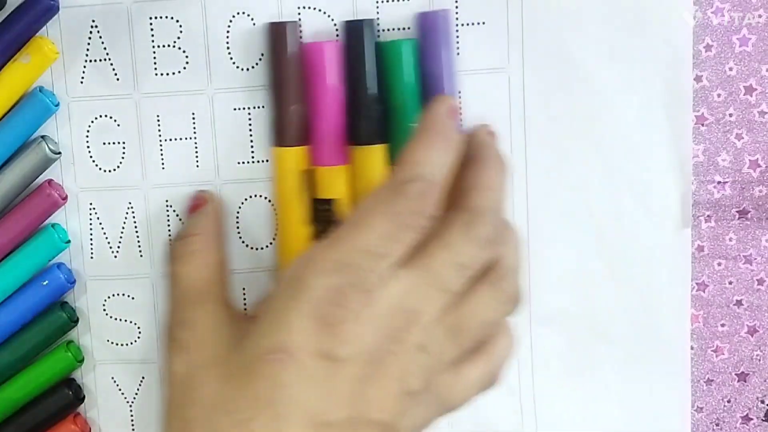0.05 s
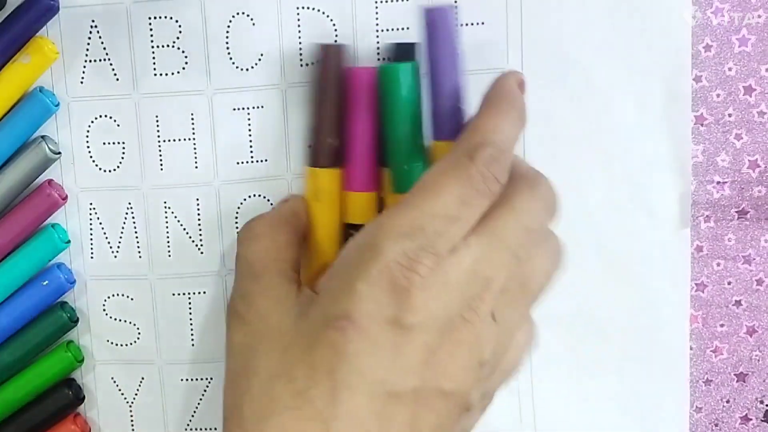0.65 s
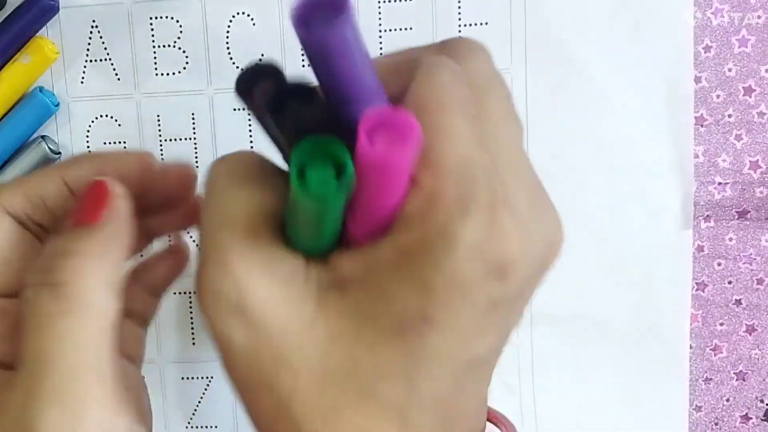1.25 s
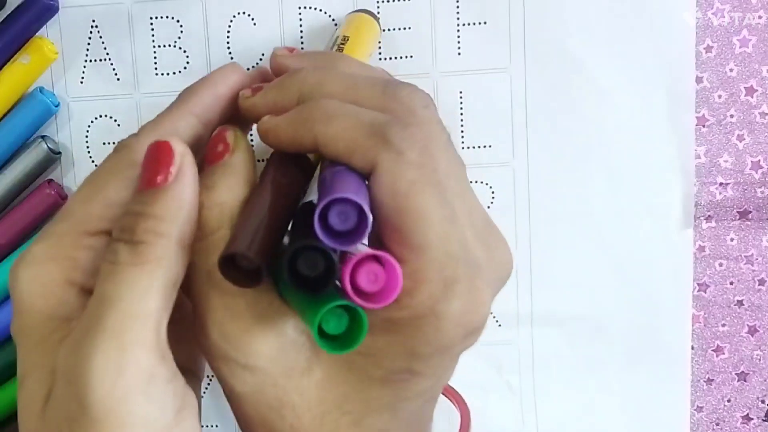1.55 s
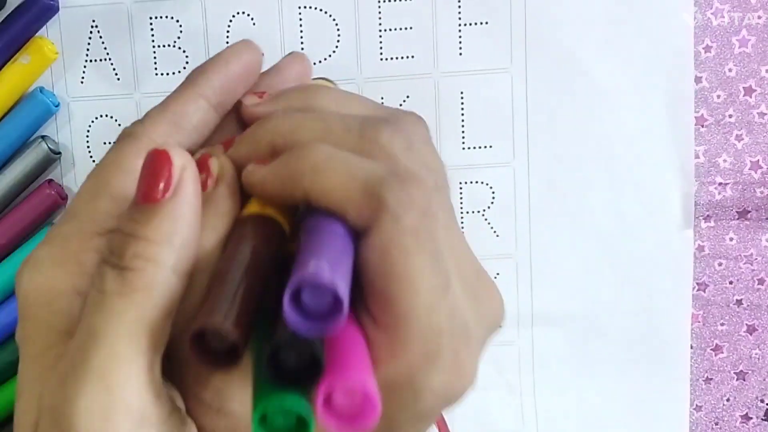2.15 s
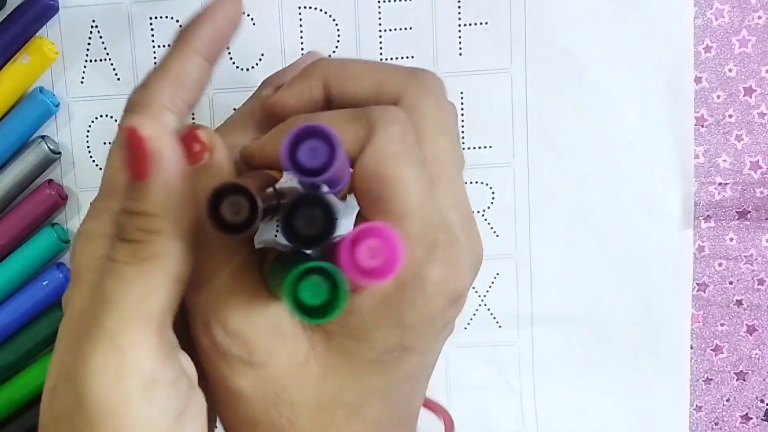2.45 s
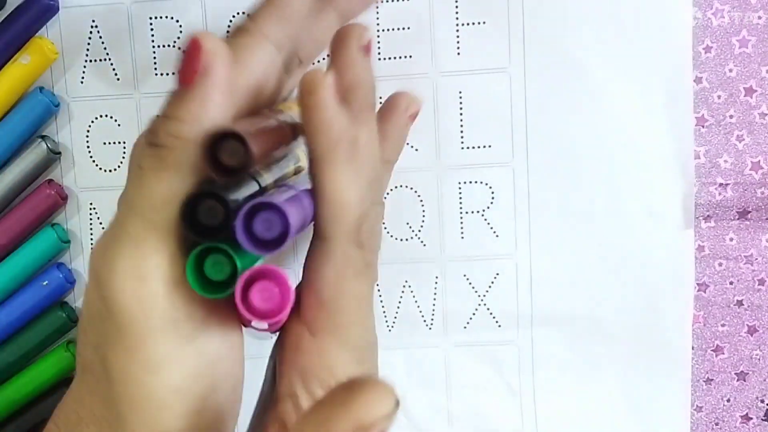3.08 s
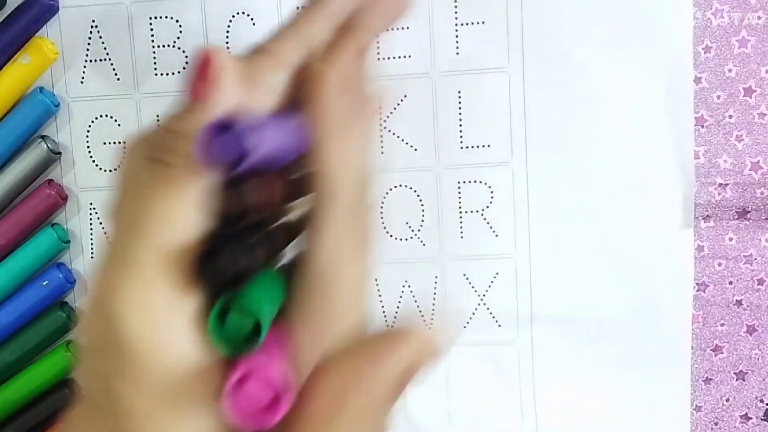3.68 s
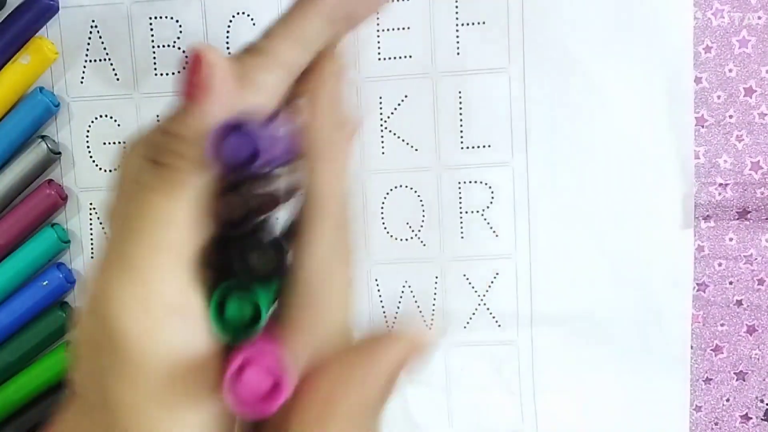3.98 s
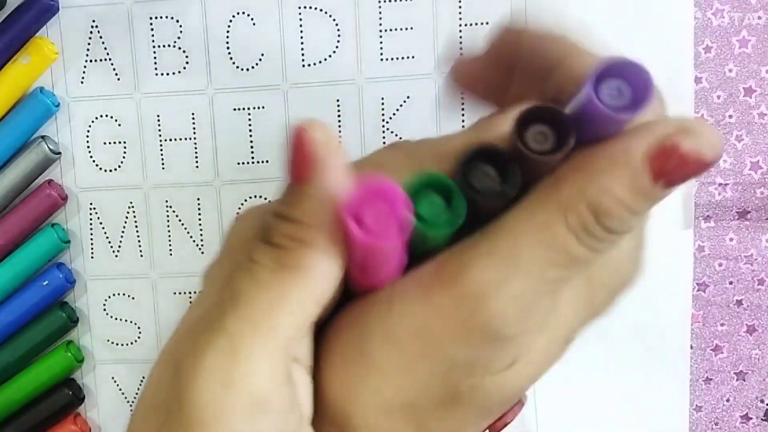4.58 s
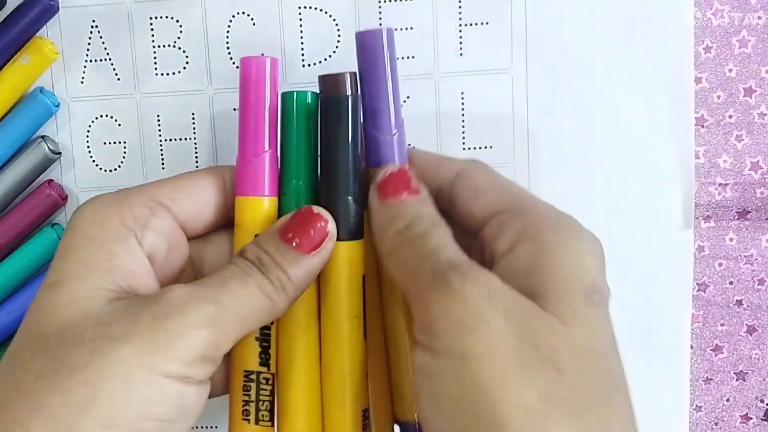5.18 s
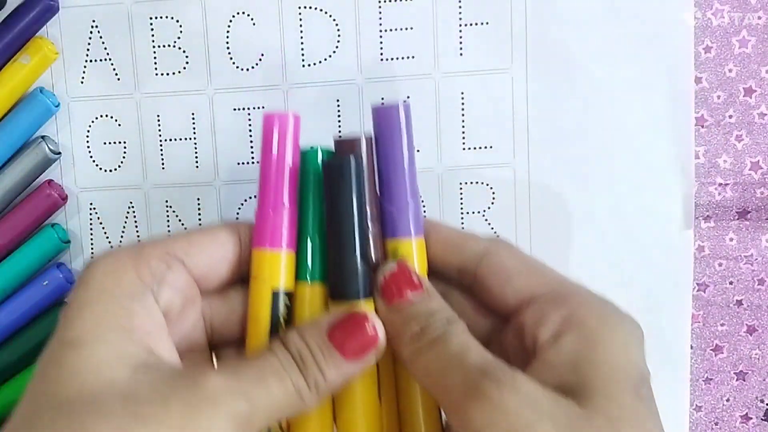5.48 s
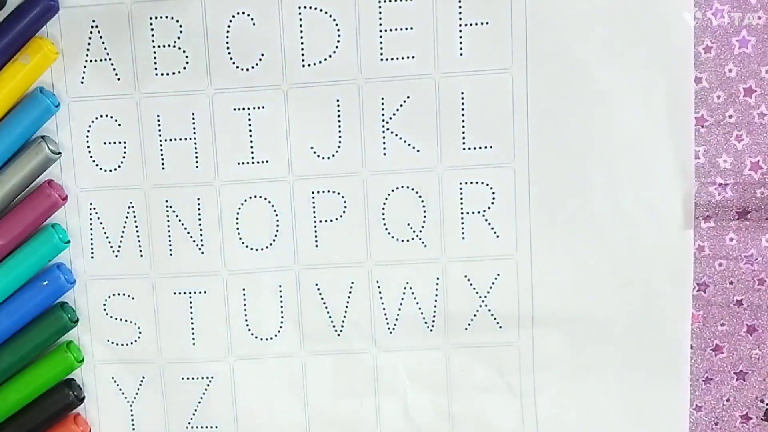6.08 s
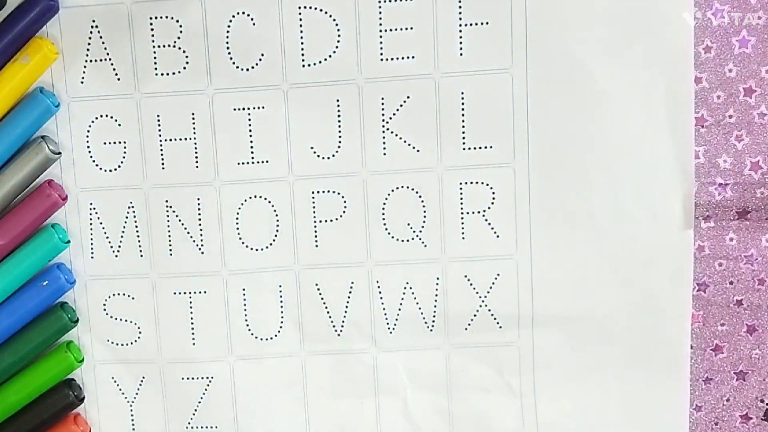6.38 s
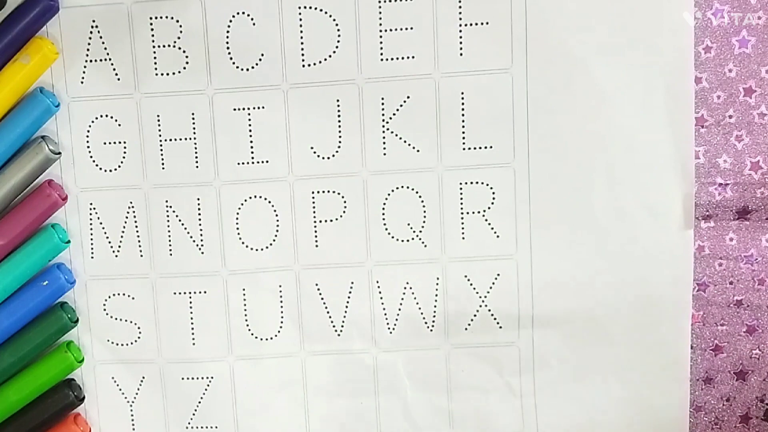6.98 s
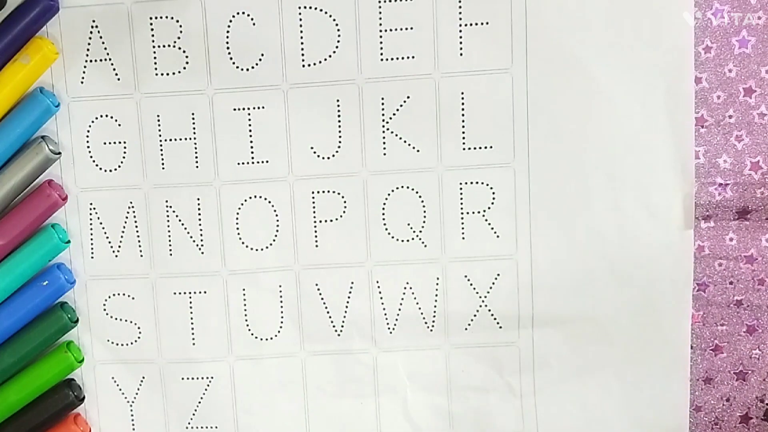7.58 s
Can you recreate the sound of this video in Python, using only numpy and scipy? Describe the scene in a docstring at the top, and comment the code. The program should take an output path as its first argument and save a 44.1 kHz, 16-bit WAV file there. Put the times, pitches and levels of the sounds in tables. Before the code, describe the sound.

Plastic marker pens click together, are knocked on a table three times, rolled between palms, then laid down with a clatter.

```python
"""A small, hard room with a soft hum. A hand gathers five plastic marker pens from a sheet of paper,
skin swishing and barrels clicking. The bundle is knocked end-on against the table three times,
then rolled to and fro between the palms, the barrels scraping and ringing. At last the pens are
laid aside and topple one after another with a rustling clatter."""
import sys
import numpy as np
from scipy import signal
from scipy.fft import rfft, irfft, next_fast_len
from scipy.io import wavfile
from scipy.ndimage import map_coordinates

SR = 44100
rng = np.random.default_rng(int(sys.argv[2]) if len(sys.argv) > 2 else 0)


def file_out(sig):
    """Save sig as 16-bit WAV at sys.argv[1]."""
    # one column per channel
    cols = np.atleast_2d(sig).T
    # limit, then scale
    lim = np.clip(cols, -1, 1)
    pcm = np.round(lim * 32767).astype(np.int16)
    wavfile.write(sys.argv[1], SR, pcm)


N = 345744
TIME = np.arange(N) / SR
HIT_SAMPLES, HIT_GAIN_DB = 2048, 12.5  # length of one blow; make-up gain on every blow
HIT_HZ = np.fft.rfftfreq(HIT_SAMPLES, 1 / SR)


def amp(db):
    """Decibels to gain."""
    return 10 ** (np.asarray(db) / 20)


def unit(x):
    """Scale to rms 1."""
    return x / np.sqrt(np.mean(x ** 2) + 1e-20)


def along(points, hz):
    """Read (Hz, value) points on a log frequency axis."""
    point_hz, values = np.transpose(points)
    return np.interp(np.log(hz + 1), np.log(point_hz + 1), values)


def fader(rows):
    """A gain that rides through (seconds, dB) points, silent outside them."""
    times, levels_db = np.transpose(rows)
    return amp(np.interp(TIME, times, levels_db, left=-120, right=-120))


def wobble(rate):
    """A smooth random curve, rate knots a second."""
    return map_coordinates(rng.standard_normal(int(N * rate / SR) + 4), [TIME * rate])


def filtered(x, response):
    """EQ x with a gain given as a function of Hz."""
    size = next_fast_len(x.shape[-1] + 8192)
    hz = np.fft.rfftfreq(size, 1 / SR)
    return irfft(rfft(x, size) * response(hz), size)[..., :x.shape[-1]]


def resonance(hz, centre, width):
    """Gain of one mode, 1 at its centre."""
    return 1 / np.hypot(1, 2 * (hz - centre) / width)


def add(track, start_s, sound):
    """Mix a sound into the track."""
    part = track[:, max(0, round(start_s * SR)):][:, :sound.shape[1]]
    part += sound[:, :part.shape[1]]


# Stereo width. Each row: frequency in Hz, side over mid in dB.
STEREO_WIDTH = [(60, -8.5), (250, -6), (700, -3.5), (1300, 1), (2200, -1), (4000, 1.5), (8000, -4.5),
                (15000, -10)]
def widen(pair):
    """Two unrelated signals become left and right, alike in the bass."""
    def mid_side_gains(hz):
        width = amp(along(STEREO_WIDTH, hz))
        return np.array([np.ones_like(hz), width]) / np.hypot(1, width)
    mid, side = filtered(pair, mid_side_gains)
    return np.array([mid + side, mid - side])


def lean_left(x, amount):
    """Pull a sound to the left, most of all in the high treble."""
    tilt = [(500, 0.3), (3000, 0.19), (12000, 1.5)]
    return filtered(x, lambda hz: amp(np.outer([0.5, -0.5], amount * along(tilt, hz))))


def noise(spectrum, grain_db=0):
    """Stereo noise of rms 1; grain_db breaks it into tiny slips of uneven size."""
    slips = rng.standard_normal((2, N)) * amp(grain_db * wobble(rate=320))
    return unit(filtered(widen(slips), lambda hz: amp(along(spectrum, hz))))


def crackle(spectrum, rate, spread_db):
    """Sparse little catches of uneven size, about rate a second, rms 1."""
    catches = (rng.random(N) < rate / SR) * amp(spread_db * rng.random(N))
    envelope = signal.lfilter([1], [1, -np.exp(-1 / (0.0005 * SR))], catches)
    bursts = envelope * rng.standard_normal((2, N))
    return unit(filtered(widen(bursts), lambda hz: amp(along(spectrum, hz))))


# Tone of the room's air and of its rumble. Each row: frequency in Hz, gain in dB.
AIR_EQ = [(25, -17), (45, -13), (85, -12.5), (150, -5), (280, -5.5), (420, -0.5), (700, -2), (1000, -6),
          (2000, -9.5), (3200, -15.5), (5000, -23.5), (7500, -28), (10000, -27.5), (16000, -26.5)]
RUMBLE_EQ = [(30, -36), (75, 0.5), (160, -2), (260, -2), (600, -32), (3000, -73)]
# The hum's tones. Each row: pitch in Hz, average level in dB.
HUM_TONES = [(102.3, -68.5), (156.1, -63), (199.2, -61.5), (393.0, -70.5)]
# Fader ride on the rumble. Each row: time in seconds, level in dB.
RUMBLE_RIDE = [(0, -59.5), (7.2, -59), (7.44, -54), (7.84, -57.5)]
def room_tone():
    """A bed of steady air with a low, wavering hum and a rumble that drifts in level."""
    air = amp(-53.5) * noise(AIR_EQ)
    hum = np.zeros(N)
    for hz, db in HUM_TONES:
        level = amp(db + 2.5 * wobble(rate=24))
        hum += level * np.sin(2 * np.pi * hz * TIME + 0.78 * wobble(rate=12))
    rumble = fader(RUMBLE_RIDE) * amp(0.7 * wobble(rate=2.45)) * noise(RUMBLE_EQ)
    return air + hum + rumble


# Resonances of a pen. Each row: centre in Hz, width in Hz, relative strength in dB.
PEN_RESONANCES = [(1203, 190, 7.5), (1765, 200, 10.5), (2690, 210, -11), (3700, 400, -15), (4230, 300, 7.5)]
def pen_body(depth):
    """The barrel's modes as an EQ, weighted afresh by where the pen is struck."""
    modes = [depth * amp(db + rng.normal(0, 2)) * resonance(HIT_HZ, centre, width)
             for centre, width, db in PEN_RESONANCES]
    return np.sqrt(1 + sum(mode ** 2 for mode in modes))


def blow(colour, chatter, chatter_t60, rise_s):
    """A sharp push, then thin chatter against the neighbours, ringing with the given colour; energy 1."""
    t = np.arange(HIT_SAMPLES) / SR
    envelope = amp(-60 * t / chatter_t60) * (1 - np.exp(-t / rise_s))
    force = widen(rng.standard_normal((2, HIT_SAMPLES))) * envelope
    force = signal.sosfilt(signal.butter(2, 850, "highpass", fs=SR, output="sos"), force)
    force *= chatter / np.linalg.norm(force, axis=1, keepdims=True)
    force[:, 0] += 1  # the push
    cepstrum = irfft(np.log(colour + 1e-6))  # folded so that nothing rings before the blow
    cepstrum[1:HIT_SAMPLES // 2] *= 2
    cepstrum[HIT_SAMPLES // 2 + 1:] = 0
    hit = irfft(rfft(force) * np.exp(rfft(cepstrum)))
    hit[1] = np.roll(hit[1], 4)  # reaches the right side four samples later
    return unit(hit) / np.sqrt(HIT_SAMPLES)


BARREL_HZ, RING_Q = 2660, 17  # a typical ring; its pitch over its width
# Tone of a plastic click. Each row: frequency in Hz, gain in dB.
CLICK_EQ = [(100, -23), (700, -9), (1150, -6), (2000, -5), (3000, 1), (4200, -2.5), (5500, -3), (7500, -8),
            (9700, -6.5), (12000, -14.5), (16000, -13)]
# Barrel against barrel. Each row: start in seconds, level in dB, ring in Hz, brightness in dB,
# left over right in dB.
BARREL_CLICKS = [(0.072, -25, 1330, 16, 6.5), (0.114, -23, 2800, -6, 0), (0.172, -27, 3350, -10, -7),
                 (0.358, -26.5, 2850, -5, -2), (0.399, -24.5, 1520, 0, 2), (0.612, -31, 4690, 8, 6),
                 (0.625, -15, 3500, -1, 4), (0.686, -18.5, 2800, -7, -2), (0.83, -10.5, 3240, 4.5, 5),
                 (0.98, -14, 2420, -2, 3), (1.016, -24.5, 2620, -6, 6), (1.039, -21, 2370, -4, -8),
                 (1.051, -20, 1860, 6.5, 16), (1.08, -17, 1710, -3, -5), (1.32, -22.5, 4520, -3.5, 0),
                 (1.825, -21, 3100, 0, -1), (2.644, -36, 2900, 5, -13), (2.788, -24, 1740, 3.5, 0),
                 (2.863, -25, 1730, -4, -1), (3.13, -35, 2870, 1, -2), (3.182, -20.5, 2550, -9, 9),
                 (3.303, -19, 1760, 11, 7), (3.331, -22.5, 1170, 9, -3), (3.45, -17.5, 1730, -1, 1),
                 (3.489, -13.5, 3870, -2.5, -1), (3.632, -12.5, 1760, -1, 2.5), (3.671, -11, 1810, -8, -2),
                 (3.696, -17, 1880, 3, 3), (3.769, -23, 1760, 9, 6), (3.849, -31.5, 2900, -22, -3),
                 (4.136, -29.5, 2120, -12, 1), (4.158, -27.5, 3600, -3, 0), (4.256, -27.5, 1790, 12, -4),
                 (4.354, -33, 2300, 3, -1), (4.544, -20, 4330, 6, 1), (4.629, -32.5, 2280, -6, 0),
                 (5.186, -29.5, 1190, 10, 4), (5.229, -39, 3030, 2, 2), (6.587, -33.5, 1780, 3, 8),
                 (6.769, -40, 2580, 10, 9), (7.145, -31, 2250, 11, 7), (7.182, -25, 2600, -1, 14),
                 (7.219, -9, 4660, 4, 10), (7.379, -22.5, 2700, 1, 6), (7.446, -28, 2310, 18, 0),
                 (7.585, -30, 2600, 4, 3)]
def clicks(rows):
    """Barrels snap together, each pair ringing briefly: the lower its pitch, the hollower and clearer."""
    out = np.zeros((2, N))
    for start, db, ring_hz, bright_db, lean_db in rows:
        hollow_db = 2 + 6.5 * np.log2(BARREL_HZ / ring_hz)
        balance_db = along([(2000, hollow_db), (2800, 0), (4500, 0), (7000, bright_db)], HIT_HZ)
        clarity = 2 * (BARREL_HZ / ring_hz) ** 1.35
        ring = 1 + clarity * resonance(HIT_HZ, ring_hz, width=ring_hz / RING_Q)
        colour = amp(along(CLICK_EQ, HIT_HZ) + balance_db) * ring * pen_body(depth=0.4)
        click = blow(colour, chatter=1.3, chatter_t60=0.015, rise_s=0.00026)
        pan = amp([[lean_db / 2], [-lean_db / 2]])
        add(out, start, amp(db + HIT_GAIN_DB) * pan * click)
    return out


ROLL_START_S = 3.338
OPEN_RING_HZ, CUPPED_RING_HZ = 2970, 1890  # scraping barrels ring lower between the palms
# Tone of the skin's swish and of the barrels' scrape. Each row: frequency in Hz, gain in dB.
SKIN_EQ = [(200, -27), (900, -24), (1500, -5), (4000, 2.5), (6400, -0.5), (7200, -3.5), (9700, 4),
           (11200, -3), (13500, 1), (16000, -10.5)]
SCRAPE_EQ = [(200, -20.5), (800, -17), (1200, -2), (2000, -6), (2900, -5.5), (4200, -8), (6000, -23),
             (16000, -51)]
# Single hand moves. Each row: middle in seconds, half length in seconds, swish in dB, scrape in dB.
HAND_STROKES = [(0.152, 0.048, -42, -50.5), (0.435, 0.05, -40.5, -51), (0.67, 0.036, -40.5, -44),
                (0.783, 0.045, -47, -44.5), (1.025, 0.058, -47, -42.5), (1.23, 0.15, -60.5, -61),
                (1.81, 0.032, -54, -57), (2.83, 0.074, -57.5, -62), (3.199, 0.022, -48, -49),
                (3.68, 0.022, -50, -43), (4.69, 0.092, -53, -66.5), (5.05, 0.07, -66, -74),
                (6.0, 0.094, -62.5, -89), (6.507, 0.61, -68.5, -70.5)]
def sliding(strokes):
    """Each stroke swells and fades: skin swishes over paper and plastic, barrels scrape and ring."""
    swish, barrels = np.zeros(N), np.zeros((2, N))
    friction = noise(SCRAPE_EQ, grain_db=2.5) + amp(-1.5) * crackle(SCRAPE_EQ, rate=260, spread_db=18)
    for middle, half, swish_db, scrape_db in strokes:
        moving = np.abs(TIME - middle) < 4 * half
        speed = np.exp(-0.5 * np.abs((TIME[moving] - middle) / half) ** 1.81)  # nearly a bell curve
        swish[moving] += amp(swish_db) * speed
        ring_hz = OPEN_RING_HZ if middle < ROLL_START_S else CUPPED_RING_HZ
        rub = friction[:, moving] * speed
        scrape = filtered(rub, lambda hz: 0.5 + 1.52 * resonance(hz, ring_hz, width=860))
        add(barrels, TIME[moving][0], amp(scrape_db) * scrape)
    skin = noise(SKIN_EQ, grain_db=-0.2) + amp(-3) * crackle(SKIN_EQ, rate=160, spread_db=33)
    return swish * lean_left(skin, amount=2) + barrels


def light_ticks(strokes, over_scrape_db=12.5, scatter_db=7.5, scatter_octaves=0.23, bright_db=4):
    """Click rows: barrels touch at two chance moments a stroke, harder the more they scrape."""
    rows = []
    for middle, half, _, scrape_db in strokes:
        for size, pitch in rng.standard_normal((2, 2)):
            start = middle + half * rng.uniform(-1.3, 1.3)
            db = scrape_db + over_scrape_db + scatter_db * size
            rows.append((start, db, BARREL_HZ * 2 ** (scatter_octaves * pitch), bright_db, 0))
    return rows


# Tone of the loose pens' rattle. Each row: frequency in Hz, gain in dB.
RATTLE_EQ = [(100, -52), (300, -1), (900, -16), (2000, -5), (3100, 0.5), (4200, 2), (5500, -13),
             (10000, -12.5), (16000, -21.5)]
# Bursts of rattle. Each row: start in seconds, release point in seconds, level in dB.
RATTLE_BURSTS = [(1.56, 1.596, -22), (2.001, 2.037, -20), (2.389, 2.398, -21.5), (3.177, 3.193, -34)]
def jostle(rise_s=0.0052, fall_s=0.0012):
    """Loose barrels rattle densely as the bundle comes down."""
    level = np.zeros(N)
    for start, end, db in RATTLE_BURSTS:
        attack = np.clip((TIME - start) / rise_s, 0, 1) ** 2
        release = np.exp(-np.maximum(TIME - end, 0) / fall_s)
        level += amp(db) * attack * release
    return level * lean_left(noise(RATTLE_EQ, grain_db=3), amount=2.5)


# Tone of the struck tabletop. Each row: frequency in Hz, gain in dB.
TABLETOP_EQ = [(60, -27), (150, -20.5), (250, -12), (310, 2.5), (520, -7), (740, 2.5), (1050, -0.5),
               (1800, -6), (2700, -1), (4200, -10), (5500, -11.5), (9500, -14.5), (16000, -32)]
# Pen ends landing. Each row: start in seconds, level in dB, thud and treble in dB against the mids.
TABLE_KNOCKS = [(1.571, 1, -5, 0), (1.579, -3, -5.5, -2), (1.591, -1, -0.5, 4), (2.012, -5, -1.5, -8),
                (2.028, -0.5, -2.5, -2), (2.401, -0.5, -3, -4.5), (2.721, -30.5, 20, -17),
                (2.758, -23, 27, -10), (3.193, -14, -4.5, -9), (3.355, -25.5, 13, -8)]
def knocks():
    """Pen ends strike the table: hard landings are bright, cushioned ones only thud."""
    out = np.zeros((2, N))
    for start, db, thud_db, treble_db in TABLE_KNOCKS:
        hardness = [(60, 0.0077), (200, thud_db), (600, thud_db), (1800, 0), (7000, treble_db)]
        colour = amp(along(TABLETOP_EQ, HIT_HZ) + along(hardness, HIT_HZ)) * pen_body(depth=0.58)
        knock = blow(colour, chatter=1.13, chatter_t60=0.012, rise_s=0.00051)
        add(out, start, amp(db + HIT_GAIN_DB) * knock)
    return out


def rolling(count=9, gap_s=0.151, half_s=0.034, swish_db=-47, scrape_db=-47.5):
    """Stroke rows: the palms rub evenly to and fro, the scrape fading as the pens fall into a row."""
    return [(ROLL_START_S + k * gap_s, half_s, swish_db - 0.14 * k, scrape_db - 2 * k)
            for k in range(count)]


# Tone of pens skidding on paper. Each row: frequency in Hz, gain in dB.
RUSTLE_EQ = [(50, -30), (120, -12), (250, -4), (500, -6), (1000, -2.5), (1900, 0.5), (2700, -1.5),
             (4200, -0.5), (6000, -6), (7500, -12.5), (9500, -6.5), (12000, -12), (16000, -15)]
# Fader ride on the rustle. Each row: time in seconds, level in dB.
RUSTLE_RIDE = [(7.1, -77), (7.194, -34), (7.32, -36.5), (7.478, -53.5), (7.644, -54), (7.84, -70)]
def lay_down():
    """The pens skid and rattle to rest on the paper, off to the left."""
    rustle = unit(noise(RUSTLE_EQ, grain_db=1.5) + amp(-7) * crackle(RUSTLE_EQ, rate=320, spread_db=37))
    return fader(RUSTLE_RIDE) * lean_left(rustle, amount=4.5)


def toppling(start_s=7.229, gap_s=0.0218, first_db=-9, loss_db=5, bright_db=1, lean_db=3):
    """Click rows: the five pens drop onto each other in turn, each softer than the last."""
    return [(start_s + k * gap_s, first_db - k * loss_db, BARREL_HZ, bright_db, lean_db)
            for k in range(5)]


# Length of the room's tail. Each row: frequency in Hz, seconds to fall by 60 dB.
REVERB_T60 = [(200, 0.13), (530, 0.68), (1400, 0.62), (2800, 0.59), (5000, 0.51), (10000, 0.45),
              (16000, 0.13)]
# Tone of the tail. Each row: frequency in Hz, gain in dB.
REVERB_EQ = [(100, 16.5), (300, 8), (600, 1), (1800, -1.5), (2400, 4.5), (2800, 2.5), (3300, -0.5),
             (6400, 3), (7500, 0.5), (9500, 0), (15000, 5.5)]
def reverb(send, early_db, early_t60, predelay_s=0.003):
    """Near surfaces answer at once, then the walls die away by band; each half second has its own tail."""
    out = np.zeros((2, N))
    block = SR // 2
    for start in range(0, N, block):
        hz, t, bands = signal.stft(rng.standard_normal((2, SR * 2 // 3)), SR, nperseg=256)
        late = amp(-60 * t / along(REVERB_T60, hz)[:, None])
        early = amp(early_db - 60 * t / early_t60)
        colour = amp(along(REVERB_EQ, hz))[:, None]
        tail = widen(signal.istft(bands * (late + early) * colour, SR, nperseg=256)[1])
        tail /= np.linalg.norm(tail[0])
        wet = signal.fftconvolve(send[:, start:start + block], tail, axes=1)
        add(out, start / SR + predelay_s, wet)
    return out


def scene():
    """The pen handling and its reverb over the room tone."""
    strokes = HAND_STROKES + rolling()
    landings = knocks() + jostle()
    rubs = sliding(strokes) + lay_down()
    ticks = clicks(BARREL_CLICKS + toppling() + light_ticks(strokes))
    send = amp(-6.5) * landings + amp(-4.5) * ticks + amp(-5) * rubs
    return landings + ticks + rubs + reverb(send, early_db=-2.5, early_t60=0.072) + room_tone()


def record(dry):
    """The loudest knocks flatten at full scale; deep rumble and the highest treble are cut."""
    low_hz, top_hz = 50, 16300
    clipped = np.clip(dry, -1, 1)
    low_cut = filtered(clipped, lambda hz: hz ** 3 / np.hypot(hz ** 3, low_hz ** 3))
    return filtered(low_cut, lambda hz: 1 / np.sqrt(1 + (hz / top_hz) ** 200))


dry = scene()
out = record(dry)
file_out(out)
```